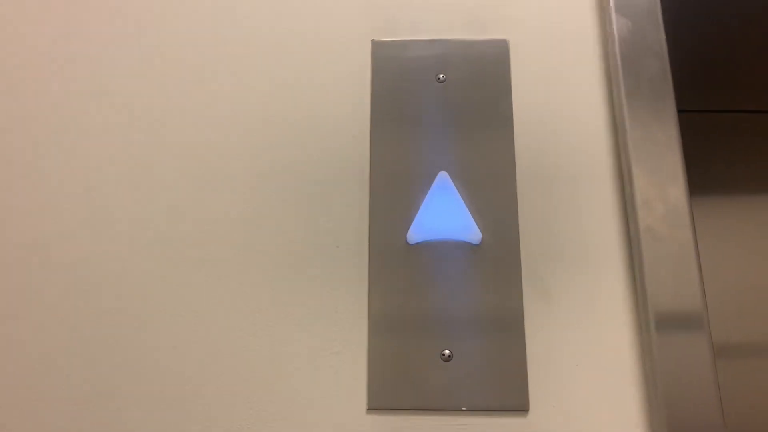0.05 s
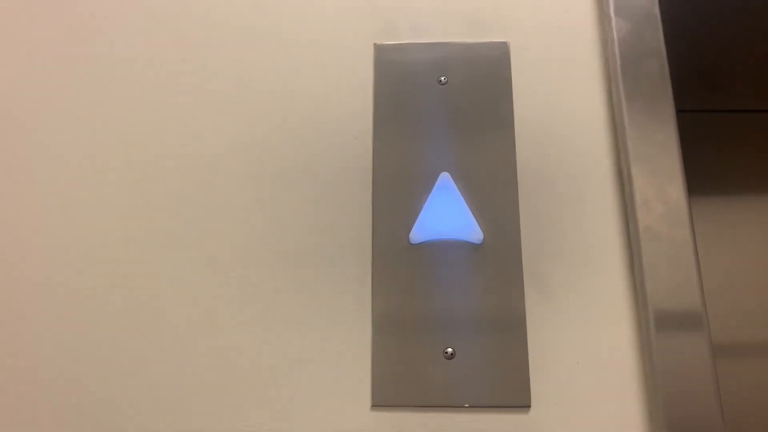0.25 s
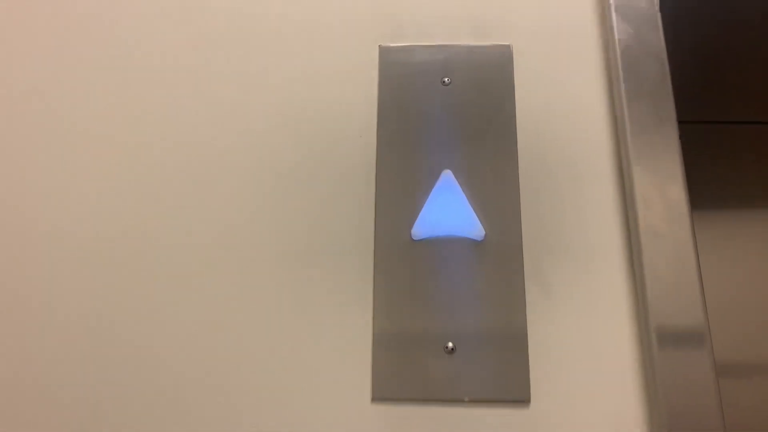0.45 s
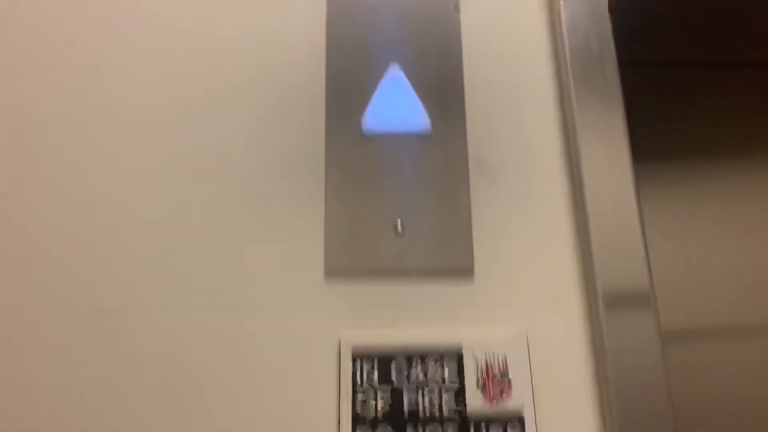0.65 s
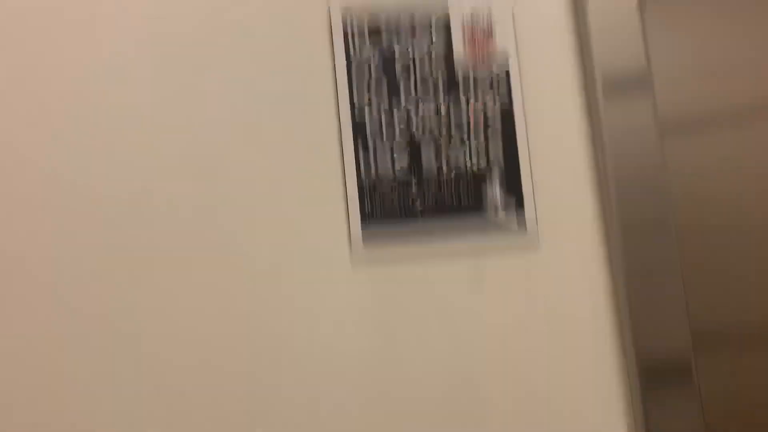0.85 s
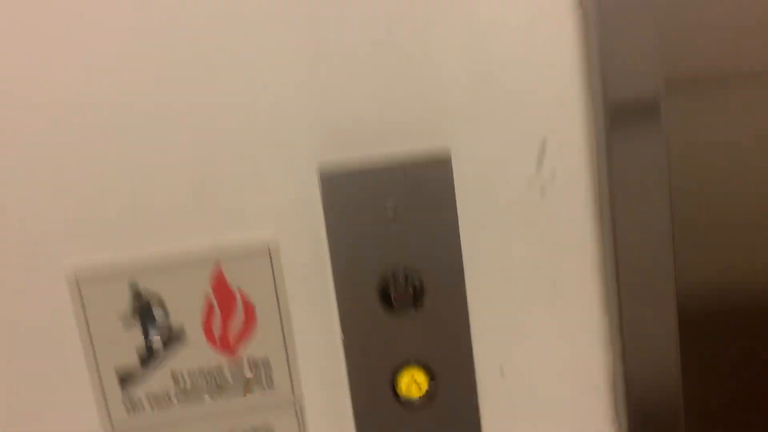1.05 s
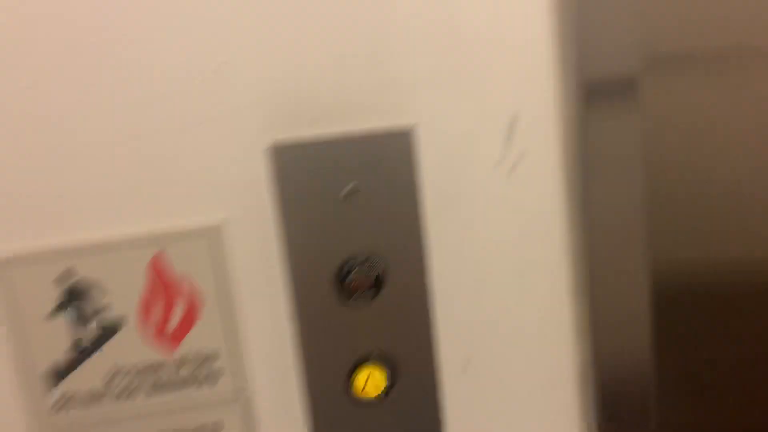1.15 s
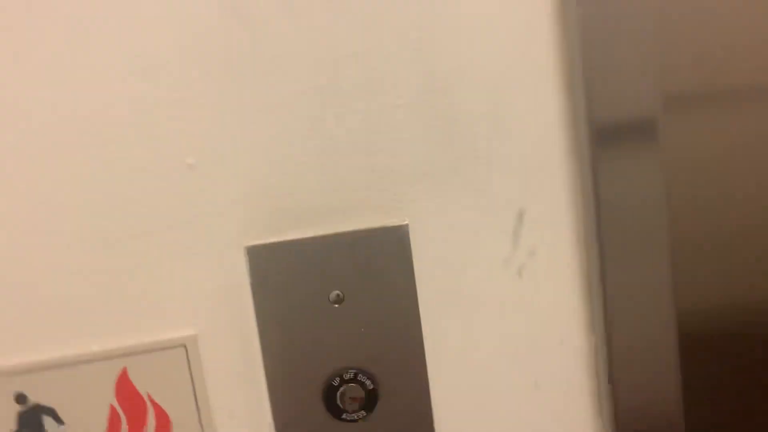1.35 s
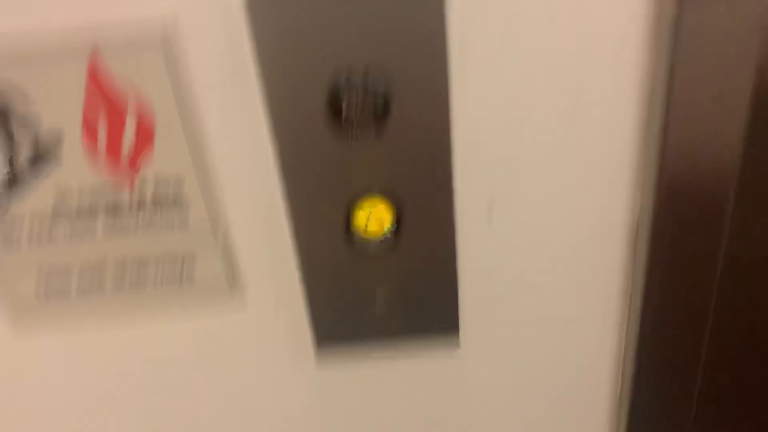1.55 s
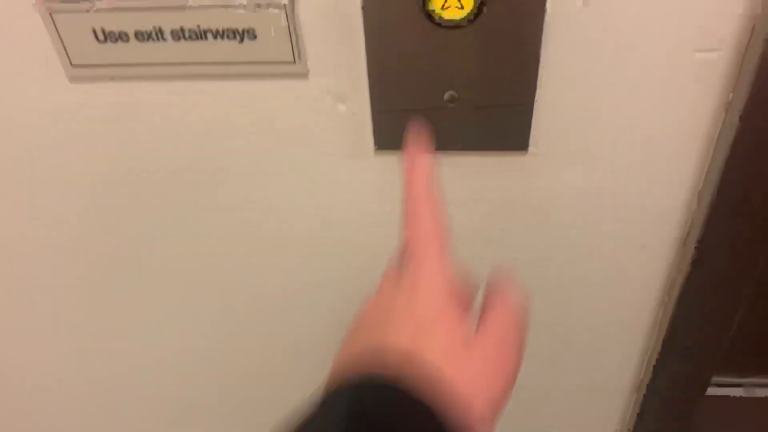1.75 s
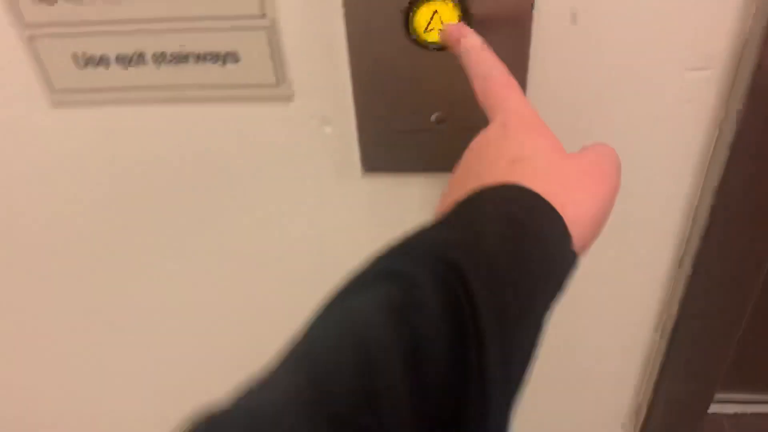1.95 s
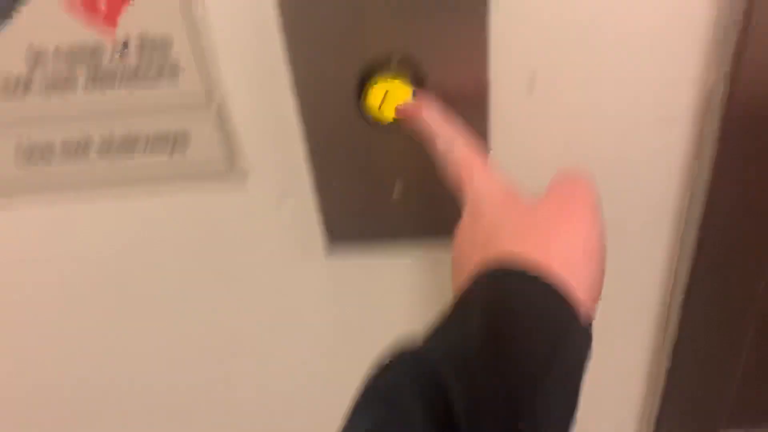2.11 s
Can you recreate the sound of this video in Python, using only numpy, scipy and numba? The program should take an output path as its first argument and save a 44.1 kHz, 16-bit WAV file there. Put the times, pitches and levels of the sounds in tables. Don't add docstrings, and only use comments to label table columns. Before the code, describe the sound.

An elevator call button is knocked and clicks back, over low ventilation rumble and sleeve rustle.

```python
import sys
import numpy as np
from scipy import signal
from scipy.fft import rfft, irfft
from scipy.io import wavfile
from scipy.ndimage import uniform_filter1d
from numba import njit

SR = 44100
rng = np.random.default_rng(int(sys.argv[2]) if len(sys.argv) > 2 else 0)


def decibels_to_gain(level_db):
    exponent = np.asarray(level_db, float) / 20
    return 10 ** exponent


def persist_wave(psi):
    counts = np.round(np.clip(psi, -1, 1) * 32767).astype(np.int16)
    wavfile.write(sys.argv[1], SR, np.atleast_2d(counts).T)


N = 96138
T = np.arange(N) / SR
HZ = np.arange(N // 2 + 1) * SR / N
STRIKE_LEN = SR // 4


def unit(x):
    return x / np.sqrt(np.mean(x ** 2))


def decay(t, t60_s):
    return np.exp(-np.log(1000) * t / t60_s)


def along(table, hz):
    a = np.array(table, float)
    return np.interp(np.log(np.maximum(hz, 1)), np.log(a[:, 0]), a[:, 1])


@njit
def svf(x, hz, q):
    y, band, low = np.empty(len(x)), 0., 0.
    for i in range(len(x)):
        g = np.tan(np.pi * hz[i] / SR)
        v = (band + g * (x[i] - low)) / (1 + g * (g + 1 / q))
        band = 2 * v - band
        low = low + 2 * g * v
        y[i] = v / q
    return y


def walk(rate_hz):
    hold = int(SR / rate_hz)
    steps = np.repeat(rng.standard_normal(N // hold + 1), hold)
    return 1.3 * uniform_filter1d(uniform_filter1d(steps, hold), hold)[:N]


def pair(alike, grain_db=0.):
    size = decibels_to_gain(grain_db * rng.exponential(size=N))
    mid, side = rfft(rng.standard_normal((2, N)) * size)
    c = np.clip(alike, 0, 1)
    return np.sqrt(1 + c) * mid + np.sqrt(1 - c) * side * np.array([[1], [-1]])


# (frequency [Hz], density [dB per Hz])
AIR_SPECTRUM = [(15, -33), (25, 1.5), (70, -8.5), (108, -12), (263, -22.5), (394, -29.5), (463, -30.5),
                (1440, -57), (16000, -68)]
# (frequency [Hz], share alike [0-1])
PORT_ALIKE = [(40, 1), (90, 0.97), (180, 0.64), (350, 0.72), (700, 0), (3000, 0.48)]
# (frequency [Hz], width [Hz], level [dB])
HUM_RESONANCES = [(45.1, 13.4, -48), (121.3, 4.9, -60.5), (238.4, 7.1, -78.5)]


def air():
    alike = along(PORT_ALIKE, HZ)
    out = unit(irfft(pair(alike) * decibels_to_gain(along(AIR_SPECTRUM, HZ)), N)) * decibels_to_gain(-46)
    for hz, width_hz, db in HUM_RESONANCES:
        resonance = 1 / (1 + ((HZ - hz) / width_hz) ** 2)
        out = out + unit(irfft(pair(alike) * resonance, N)) * decibels_to_gain(db)
    return out


# (time [s], fold level [dB], fold resonance [Hz], drag level [dB])
ARM_MOTION = [(.2, -99.5, 1390, -82), (.31, -88, 1270, -73), (.38, -92, 1550, -79), (.51, -79, 1580, -76.5),
              (.66, -84.5, 1400, -70.5), (.72, -80.5, 1480, -67.5), (.82, -68, 1610, -59),
              (.855, -69, 1590, -60.5), (.905, -64, 1660, -56.5), (.95, -70.5, 1680, -59),
              (.99, -76, 1900, -58.5), (1.008, -83, 1730, -65), (1.13, -99, 1820, -78.5),
              (1.25, -74, 2020, -67), (1.33, -73, 1770, -63.5), (1.36, -66, 2070, -59.5),
              (1.39, -63, 2060, -60.5), (1.44, -65.5, 1930, -59), (1.48, -72, 2200, -54.5),
              (1.53, -69.5, 2120, -55), (1.62, -77, 2070, -60), (1.84, -75.5, 1880, -60.5),
              (1.97, -93, 1560, -71), (2.18, -82, 1600, -78)]
# (frequency [Hz], density [dB per Hz])
CLOTH_SPECTRUM = [(250, -5.5), (450, -9), (1000, -13.5), (2400, -24.5), (4500, -24.5), (7000, -30.5),
                  (10000, -33), (16000, -35.5)]
# (frequency [Hz], Q [1], level [dB])
GARMENT_HOLLOWS = [(2450, 5, -0.5), (3700, 4, -15)]


def sleeve():
    grain_db = 2.5
    scuff_s, scuff_db, scuff_hz, scuff_t60_s = 1.156, -56, 3070, .22
    s, fold_db, fold_hz, drag_db = np.array(ARM_MOTION, float).T
    hiss = unit(irfft(pair(0.14, grain_db) * decibels_to_gain(along(CLOTH_SPECTRUM, HZ)), N))
    rub = irfft(pair(0.58, grain_db), N)

    def tuned(hz, q):
        centre = hz + 0 * T
        return unit(np.array([svf(svf(c, centre, 1. * q), centre, 1. * q) for c in rub]))

    drifting_hz = np.interp(T, s, fold_hz) * (1 + .012 * walk(26.4))
    fold = tuned(drifting_hz, 5.0) * decibels_to_gain(6.5 + 1.5 * walk(39.5))
    for hz, q, db in GARMENT_HOLLOWS:
        fold = fold + tuned(hz, q) * decibels_to_gain(db + walk(28))
    late = np.maximum(T - scuff_s, 0)
    scuff = decibels_to_gain(scuff_db) * np.clip(late / 0.012, 0, 1) * decay(late, scuff_t60_s)
    drag = decibels_to_gain(np.interp(T, s, drag_db, left=-110) + 1.15 * walk(14.0))
    fold = fold * decibels_to_gain(np.interp(T, s, fold_db, left=-110))
    return fold + hiss * (drag + scuff) + tuned(scuff_hz, 4.7) * scuff * decibels_to_gain(-4.0)


def ring(modes, spread, rise_s, buzz_db, buzz_t60_s):
    hz, db, t60_s = np.array(modes, float).T[:, :, None]
    t = T[:STRIKE_LEN]
    detune, turn, scatter = rng.standard_normal((3, len(modes), 1))
    port = np.array([1, -1])[:, None, None]
    phase = 2 * np.pi * hz * (1 + 0.019 * detune) * t + spread * (turn + hz / 500) * port
    tone = (decibels_to_gain(db + 1.5 * scatter) * np.sin(phase) * decay(t, t60_s)).sum(axis=1)
    edges_hz = [hz.min() * 0.8, min(hz.max() * 0.88, .45 * SR)]
    sos = signal.butter(2, edges_hz, "band", fs=SR, output="sos")
    buzz = unit(signal.sosfilt(sos, rng.standard_normal((2, len(t)))))
    return (tone / 2 + buzz * decibels_to_gain(buzz_db) * decay(t, buzz_t60_s)) * (1 - np.exp(-t / rise_s))


# (frequency [Hz], level [dB], t60 [s])
BOOM_MODES = [(51.3, 3, 0.38), (73, -14, 0.042)]
# (time [s], level [dB])
BOOM_EVENTS = [
    (0.956, -32.5),
    (2.06, -32.5),
    (2.1, -45),
    (2.165, -24),
]
# (frequency [Hz], level [dB], t60 [s])
WALL_MODES = [(81, -3.5, 0.35), (132.7, 2.5, 0.17), (191.4, -2, 0.18), (244, 2, 0.15), (301, 4, 0.096),
              (343, -8.5, 0.34), (419, -0.5, 0.14), (481.5, 2, 0.048), (510, 1.5, 0.12), (611.5, -4, 0.13),
              (667, -22.5, 0.11)]
# (frequency [Hz], level [dB], t60 [s])
PLATE_MODES = [(793, 8.5, 0.057), (920, 9.5, 0.043), (1053, 6.5, 0.11), (1275, 0, 0.16), (1556, 4.5, 0.067),
               (1863, 1.5, 0.088), (2202, 2, 0.061), (2920, -6, 0.081)]
# (frequency [Hz], level [dB], t60 [s])
SWITCH_MODES = [(4300, -16, .004), (5600, -15, .004), (7500, -14, .003), (11100, -4, .003),
                (12500, -5, .003), (14400, -1, .003), (15300, 2, .003)]
# (time [s], thud [dB], rattle [dB], tick [dB], pan L-R [dB])
CONTACTS = [
    (1.86, -39.5, -47.5, -38, 6),
    (1.865, -37.5, -44, -34.5, 0.5),
    (1.874, -39, -45, -41, -3.5),
    (1.9025, -33.5, -48.5, -39, -3),
    (1.93, -40, -75, -59, 4),
    (1.954, -41.5, -89, -85.5, 0),
    (2.002, -43, -85, -74, 1),
    (2.043, -44, -63, -61, -1),
    (2.061, -44, -59.5, -73, -1.5),
    (2.095, -46.5, -64, -64, 2),
]
# (frequency [Hz], level [dB], t60 [s])
SPRING_MODES = [(1000, -9, .02), (1420, -7, .025), (1570, -3, .04), (1720, -6, .05), (2700, -7, .015),
                (3170, -6, .012), (4230, -5, .01), (5500, -6, .008), (6370, -6, .008)]
# (frequency [Hz], level [dB], t60 [s])
TAP_MODES = [(450, -4, .04), (520, 0, .05), (610, -3, .04), (690, -8, .03), (1500, -20, .03)]
# (time [s], level [dB], pan L-R [dB])
SOFT_TAPS = [
    (2.1455, -47, 0),
    (2.165, -36, -10),
]


def add_strikes(layers):
    # (modes, phase spread, rise s, buzz dB, buzz t60 s), room layer
    thud = (WALL_MODES, 0.096, 0.0029, -4.5, 0.093), 0
    rattle = (PLATE_MODES, 0.88, 0.0011, -0.78, 0.16), 1
    tick = (SWITCH_MODES, 0.84, 0.00014, -9, 0.026), 2
    snap = (SWITCH_MODES, .3, .00012, -33, .05), 2
    spring = (SPRING_MODES, .03, .0005, -11, .11), 2
    tap = (TAP_MODES, .15, .003, -14, .03), 0
    boom = (BOOM_MODES, .05, .012, -40, .05), 0
    snap_s = 2.0542
    strikes = [(snap_s, -18, 0, snap), (snap_s, -36, 0, spring)]
    for s, thud_db, rattle_db, tick_db, pan_db in CONTACTS:
        strikes += [(s, thud_db, pan_db, thud), (s, rattle_db, pan_db, rattle), (s, tick_db, pan_db, tick)]
    strikes += [(s, db, pan_db, tap) for s, db, pan_db in SOFT_TAPS]
    strikes += [(s, db, 0, boom) for s, db in BOOM_EVENTS]
    for s, db, pan_db, (body, layer) in strikes:
        i = int(s * SR)
        gain = decibels_to_gain(db + np.array([[pan_db], [-pan_db]]) / 2)
        layers[layer, :, i:i + STRIKE_LEN] += ring(*body) * gain


def knock(hz, t60_s, port_rad):
    t, rise_cycles = T[:STRIKE_LEN], 0.81
    phase = 2 * np.pi * hz * t + port_rad * np.array([[1], [-1]])
    return np.sin(phase) * decay(t, t60_s) * (1 - np.exp(-t * hz / rise_cycles))


# (time [s], level [dB], pitch [Hz], t60 [s], phase between ports [rad])
HOLLOW_KNOCKS = [(1.8595, -39.5, 1590, .03, -0.33), (1.861, -34.5, 1072, 0.036, 0.66),
                 (1.863, -38, 2220, 0.026, -.5), (1.8645, -32, 790, 0.047, 0.9),
                 (1.8657, -26.5, 477, 0.053, 0.21), (1.866, -35, 1700, .04, .9),
                 (1.870, -36, 1925, 0.039, 0.36), (1.874, -28, 499, 0.057, 0.62),
                 (1.8745, -29, 287, 0.071, -0.23), (1.879, -30.5, 196.7, 0.093, -.05),
                 (1.894, -30.5, 486, 0.029, 0.41), (1.9025, -40.5, 2476, 0.026, -1.2),
                 (1.9027, -40.5, 4830, 0.0059, -1.3), (1.903, -46.5, 1705, 0.058, 0.12),
                 (1.905, -28, 473, 0.033, -0.01), (1.9183, -31.5, 489, 0.054, .1),
                 (1.932, -35, 482, 0.046, -0.042), (1.953, -40.5, 203.5, .1, -0.23),
                 (1.974, -49, 444, 0.06, 0.48), (2.002, -43, 537, 0.046, 0.43),
                 (2.003, -47.5, 680, 0.017, 0.19), (2.011, -39.5, 332, 0.035, -0.15),
                 (2.024, -47, 492, 0.048, 0.002), (2.075, -51.5, 1640, .04, -0.11),
                 (2.1455, -42.5, 663, 0.027, 0.63), (2.148, -39.5, 510, 0.041, -0.015),
                 (2.164, -33.5, 565, 0.028, 0.65), (2.164, -57, 1480, .025, 0.47),
                 (2.165, -39, 417, 0.073, .2)]


def add_knocks(layers):
    for s, db, hz, t60_s, port_rad in HOLLOW_KNOCKS:
        i = int(s * SR)
        layers[1, :, i:i + STRIKE_LEN] += knock(hz, t60_s, port_rad) * decibels_to_gain(db + np.array([[.8], [-.8]]))


def lobby(dry, room_db, t60_s):
    t = T[:SR // 2]
    tail = irfft(pair(along(PORT_ALIKE, HZ)), N)[:, :len(t)]
    tail = tail * decay(t, t60_s) * np.clip(t / 0.0012, 0, 1)
    tail = tail / np.sqrt((tail ** 2).sum() / 2)
    return decibels_to_gain(room_db) * signal.fftconvolve(dry, tail, axes=1)[:, :N]


def button():
    layers = np.zeros((3, 2, N + SR))
    add_strikes(layers)
    add_knocks(layers)
    out = 0
    for dry, room_db, t60_s in zip(layers[:, :, :N], [-7, -11, -19], [.55, .36, .3]):
        out = out + dry + lobby(dry, room_db, t60_s)
    return out


def scene():
    faint_top_hz = 15750
    sos = signal.ellip(8, .2, 50, faint_top_hz, fs=SR, output="sos")
    return signal.sosfilt(sos, air() + sleeve()) + button()


def top_cut(x):
    return signal.sosfilt(signal.butter(12, 17000, fs=SR, output="sos"), x)


def record(dry):
    split_hz, top_hz = 7400, 16550
    body_lag, port_lag, edge = 5, 8, 2048
    wide = np.pad(dry, ((0, 0), (edge, edge)), mode="reflect")
    hz = np.arange(N // 2 + edge + 1) * SR / (N + 2 * edge)
    spec = rfft(wide)

    def late(left, right):
        return np.exp(-2j * np.pi * hz / SR * np.array([[left], [right]]))

    high = 1 / (1 + np.exp(-(hz - split_hz) / 266.0))
    top = 1 / (1 + np.exp(np.clip((hz - top_hz) / 130.0, -50, 12)))
    low_cut = 1 + (36 / np.maximum(hz, 1)) ** 6
    body = spec * late(0, body_lag) * np.sqrt(1 - high)
    treble = spec[0] * late(port_lag, 0) * np.sqrt(high)
    heard = irfft((body + treble) * top / low_cut, N + 2 * edge)[:, edge:-edge]
    return top_cut(heard)


dry = scene()
out = record(dry)
persist_wave(out)
```